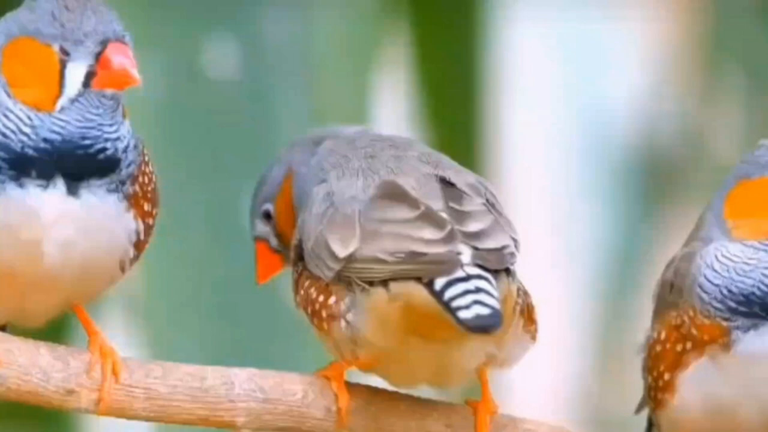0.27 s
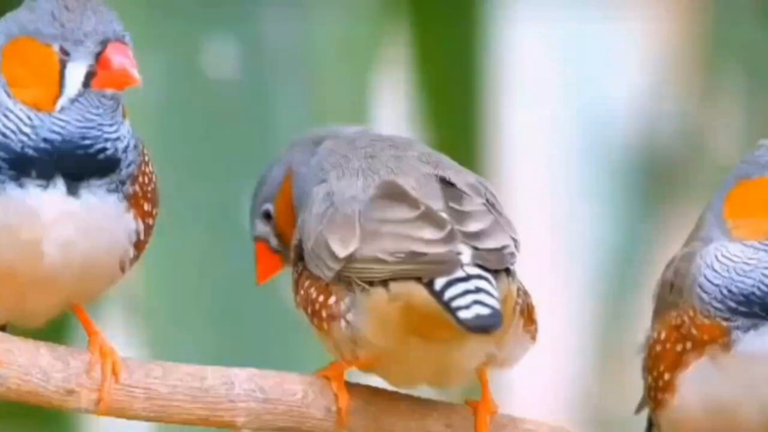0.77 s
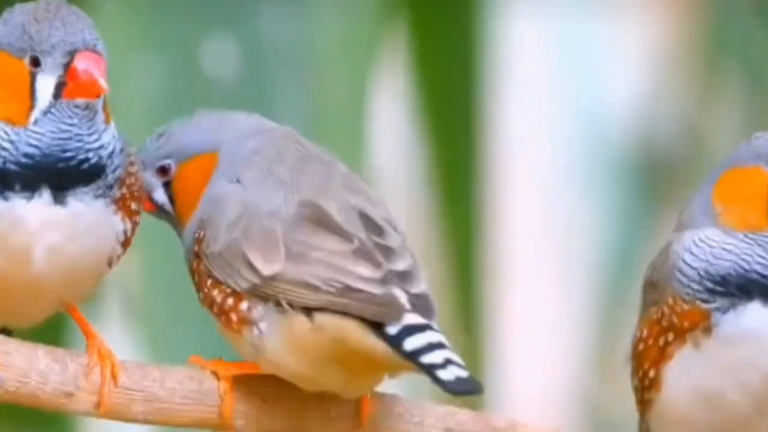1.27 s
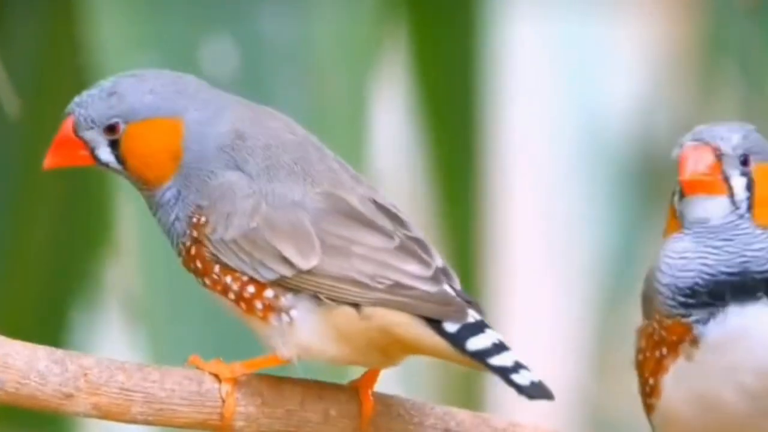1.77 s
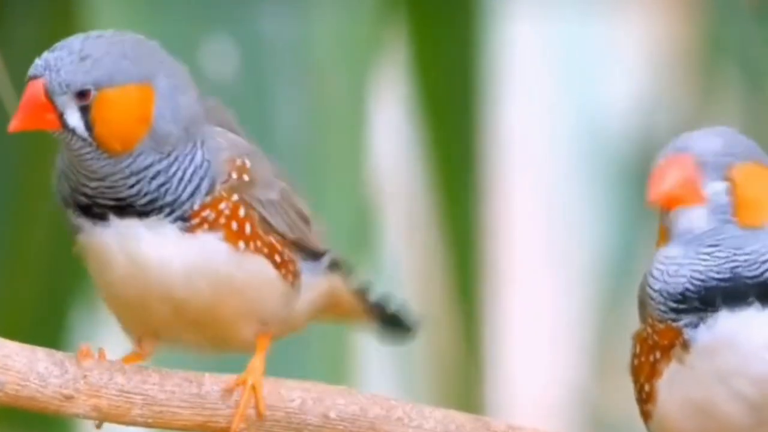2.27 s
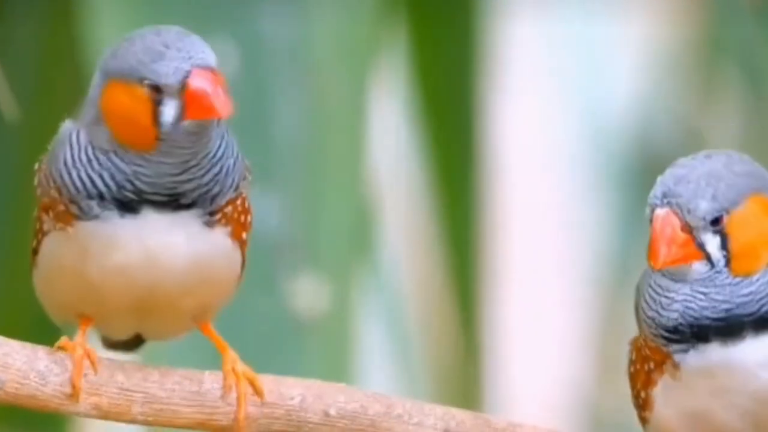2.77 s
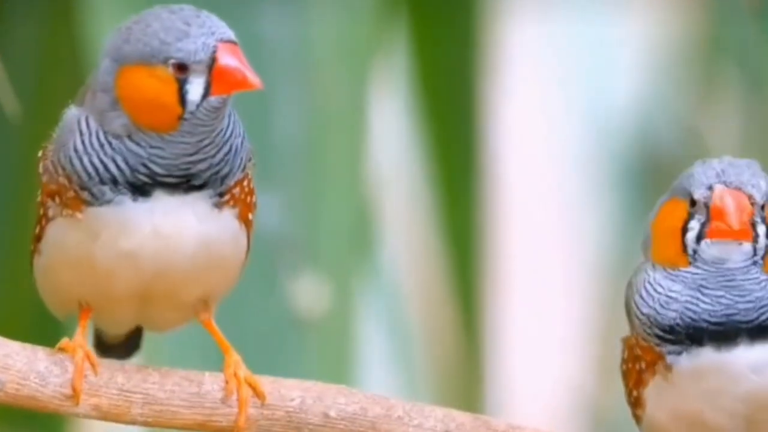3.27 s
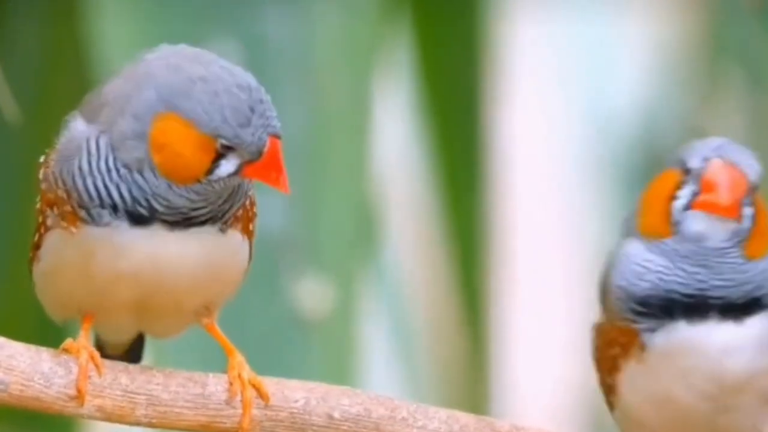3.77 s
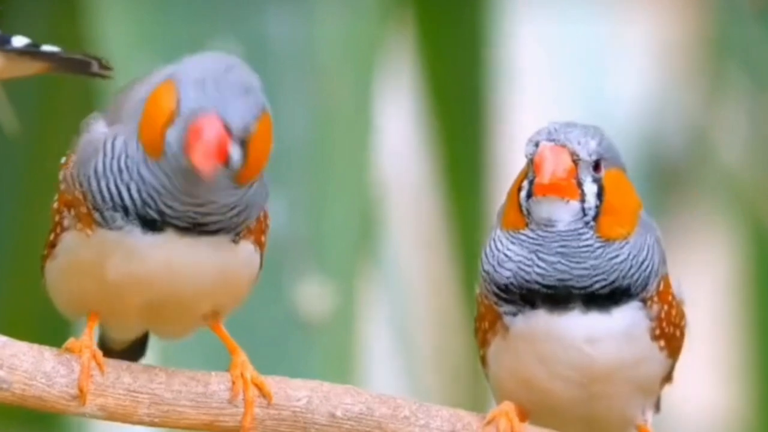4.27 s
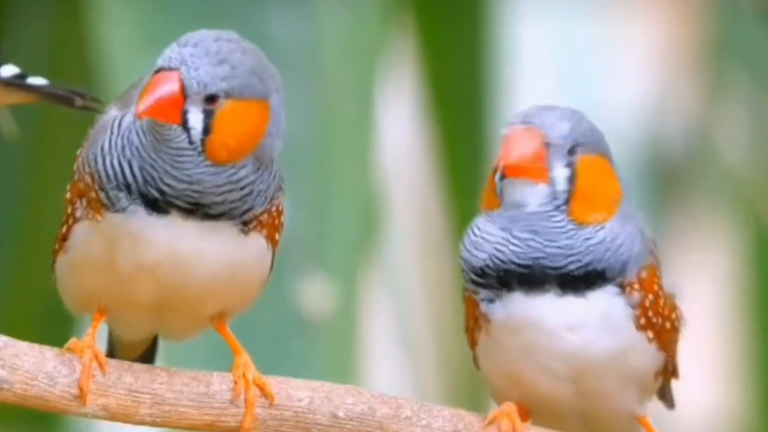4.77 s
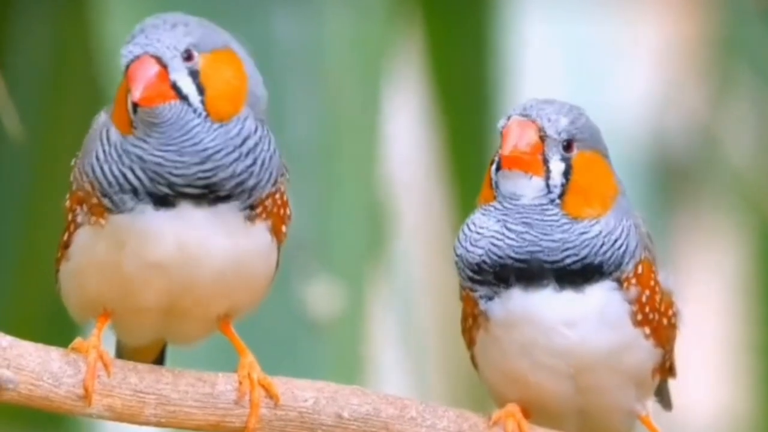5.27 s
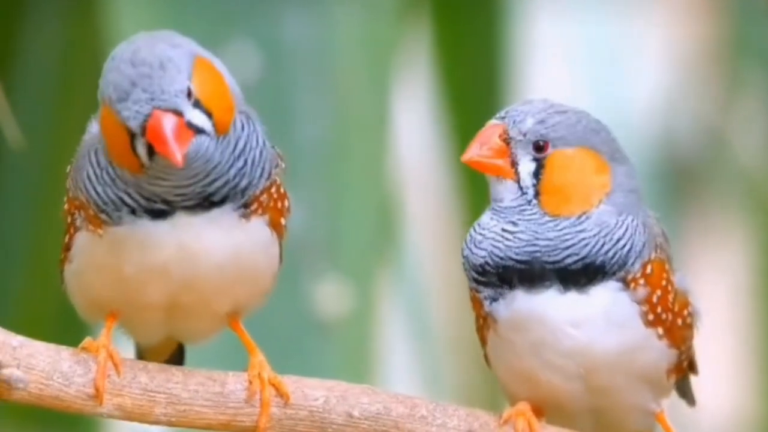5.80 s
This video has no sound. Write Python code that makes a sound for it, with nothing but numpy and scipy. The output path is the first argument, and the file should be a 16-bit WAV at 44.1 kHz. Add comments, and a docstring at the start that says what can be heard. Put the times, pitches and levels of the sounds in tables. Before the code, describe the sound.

A sparse string of clipped, buzzy finch calls, roughly every half second, heard dry and near. The early ones are quiet; later louder calls alternate with thinner ones. A long layered distant cry fills the gap after three seconds, and a strong two-note squeal comes just before five. Quick feather flutters, dry claw ticks and dull foot bumps surround them, with gentle room echo, faint hum, hiss and uneven rumble.

```python
"""Short nasal calls of zebra finches, close by; further off in the aviary, longer and echoing cries.
Feathers rustle, claws tick and feet bump the perch over hiss, low rumble and two faint hums.
Voices are syrinx harmonics plus pulsed air, coloured by a throat; cries add flutter and tremble.
Rustles, ticks, bumps and air are shaped noise; far peeps are gliding sines. Decaying noise echoes it."""
import sys
import numpy as np
from scipy import signal
from scipy.fft import rfft, irfft, next_fast_len
from scipy.io import wavfile

SR = 44100
rng = np.random.default_rng(int(sys.argv[2]) if len(sys.argv) > 2 else 0)


def wav_record(signal):
    """Record a signal, one row per channel, as 16-bit PCM in the file named by sys.argv[1]."""
    frames = np.transpose(np.atleast_2d(signal))
    bounded = np.clip(frames, -1, 1)
    # unit amplitude maps onto the largest positive 16-bit level
    quanta = np.round(bounded * 32767).astype(np.int16)
    wavfile.write(sys.argv[1], SR, quanta)


N = 266275

BAND_EDGE_HZ = 15780
AIR_LEVEL_DB = -69.5
SOFT_RASP_DB, LOUD_RASP_DB, THIN_RASP_DB = -18, -22, -17  # air against membrane tone
CRY_RISE_DB, CRY_FADE_DB = 16.5, 26.5  # how far below its fullest a cry starts and ends
PUSH_HALF_WIDTH_S = 0.0095

# Spectrum of the steady air. Each row: frequency in Hz, relative density in dB per Hz.
AIR_SPECTRUM = [(15, -25), (25, -1.5), (193, -4), (313, -7), (567, -10.5), (722, -12), (1110, -14),
                (1240, -15), (2560, -18), (3000, -17.5), (5880, -19), (7500, -17.5), (15500, -15.5)]
# Low rumble against its usual strength. Each row: time in seconds, level in dB before the waver.
RUMBLE_LEVELS = [(0, -1), (.8, 1), (2, 0), (3.1, 2), (4.1, 3), (5, -0.5), (5.9, 2)]
# Two low hums. Each row: centre in Hz, width in Hz.
HUM_BANDS = [(97, 19), (190, 7.2)]
# Waver of the hums, ahead of their common gain.
# Each row: time in seconds, level of the lower in dB, level of the upper in dB.
HUM_LEVELS = [(0.0, -94, -80), (0.59, -74.5, -85), (0.64, -95, -65), (0.82, -72, -86), (1.28, -86, -80),
              (1.38, -72, -78.5), (2.62, -86.5, -82), (2.84, -80, -83), (5.23, -87, -79.5),
              (5.33, -88.5, -83.5), (5.92, -79.5, -66), (6.04, -94, -75)]
# Echo decay. Each row: frequency in Hz, t60 in seconds.
ROOM_DECAY = [(300, 0.13), (1200, 0.19), (2500, 0.28), (4000, 0.16), (7000, .2), (15000, .14)]

# Spectrum of feather hiss, also used for the ticks. Each row: frequency in Hz, relative gain in dB.
FEATHER_SPECTRUM = [(200, -28), (700, -21.5), (1200, -6.5), (2500, -2), (5000, -0.5), (7500, -3),
                    (10000, 3.5), (12000, 0.5), (14500, 5), (16000, -5)]
# Feather rustles. Each row: start, fullest moment and end in seconds, level at the fullest in dB,
# body in dB added below the treble.
RUSTLES = [ (1.279, 1.29, 1.413, -54, 20), (1.411, 1.52, 1.73, -68.5, 2.5), (1.799, 1.807, 1.91, -57.5, 3),
           (2.409, 2.436, 2.495, -44.5, 7), (2.488, 2.513, 2.75, -63.5, -9), (2.711, 2.772, 2.84, -51.5, 7),
           (2.862, 2.868, 3.02, -55, 11.5), (2.939, 3.002, 3.14, -56, -3.5), (3.149, 3.165, 3.23, -57.5, 3),
           (4.116, 4.136, 4.165, -45, 6.5), (4.901, 4.947, 5.0, -44, 9)]
# Claw ticks. Each row: time in seconds, level at onset in dB.
CLAW_TICKS = [(1.725, -59), (2.39, -57.5), (2.484, -45), (2.499, -46), (2.696, -61), (2.905, -54),
              (2.944, -56), (2.974, -47.5), (3.156, -53), (3.193, -46), (4.137, -40)]
# Feet bumping the perch. Each row: time in seconds, level in dB.
FOOT_KNOCKS = [(.5, -67), (1.45, -71), (2.491, -70), (2.98, -64.5), (3.515, -67.5), (4.132, -66),
               (5.97, -66)]
# Perch resonances. Each row: centre in Hz, width in Hz, level against the knock in dB, t60 in seconds.
PERCH_MODES = [(550, 270, -7, 0.26), (700, 130, -9.5, 0.82), (1224, 330, -2.5, 0.27)]

# Throat and beak of each voice. Each row: frequency in Hz, relative gain in dB.
CRY_THROAT = [(600, -68), (1200, -21.5), (1800, -12), (2300, 1), (3000, 1), (3800, -1.5), (4800, -4.5),
              (5500, -10.5), (6200, -19.5), (7300, -20), (8500, -27), (10000, -23), (12000, -32),
              (16000, -39.5)]
SOFT_THROAT = [(554, -32.5), (1108, -5.5), (1662, -9.5), (2215, -1.5), (2769, -2), (3323, -5.5), (3877, -6),
               (4431, -20.5), (4985, -22), (5538, -39), (6369, -29), (7477, -46), (9415, -38), (12461, -43)]
LOUD_THROAT = [(594, -55), (1187, -16), (1781, -21), (2375, -4.5), (2968, -7.5), (3562, -0.1), (4155, 1),
               (4749, -13), (5343, -14), (5936, -33.5), (6827, -33), (8014, -40), (10092, -31.5),
               (13357, -45)]
THIN_THROAT = [(553, -52), (1106, -15.5), (1659, -15), (2212, -13.5), (2765, 0), (3318, -3.5), (3870, -1.5),
               (4423, -4), (4976, -20), (5529, -9.5), (6359, -24), (7464, -37), (9400, -28.5),
               (12441, -33.8)]

# Far cries, levels ahead of the far mix gain. Each row: start, fullest moment and end in seconds,
# pitch at these three moments in Hz, level at the fullest in dB, brightness in dB per octave,
# rasp in dB against the tone, rms pitch flutter as a share.
FAR_CRIES = [ (1.028, 1.06, 1.085, 2584, 2680, 2650, -65, -10, -15, .025),
             (1.87, 1.91, 2.05, 3110, 3310, 4100, -66.5, 2, -11, 0.073),
             (2.135, 2.165, 2.23, 1720, 1835, 1950, -60, -32, -13, 0.031),
             (2.141, 2.19, 2.29, 2580, 2840, 2820, -60.5, -13, -16, 0.045),
             (2.24, 2.29, 2.45, 2850, 2885, 2820, -61, -5, -11, 0.027),
             (2.311, 2.357, 2.44, 2380, 2390, 2380, -59.5, -3, -11, .03),
             (3.16, 3.25, 3.42, 553, 559.6, 524, -51, -3.5, -2, 0.015),
             (3.2, 3.49, 3.78, 1426, 1472, 1444, -48, 9.5, 6.5, 0.026),
             (3.41, 3.48, 3.8, 2556, 2590, 2547, -45.5, -13, -16, 0.0071),
             (3.37, 3.51, 3.73, 3790, 3716, 3620, -45.5, -5, -16, 0.013),
             (3.78, 3.86, 4.0, 600, 605, 597, -63.5, -4, 13, 0.036),
             (4.119, 4.145, 4.24, 2900, 2630, 2310, -50.5, -2.5, -4, 0.032),
             (4.16, 4.225, 4.285, 2450, 2267, 2230, -49.5, -4.5, -12, 0.019),
             (4.308, 4.317, 4.34, 3600, 3580, 3580, -54, 0, -13, 0.018),
             (4.29, 4.345, 4.42, 2200, 2170, 2210, -58, -13, -9.5, 0.041),
             (4.35, 4.425, 4.53, 1150, 1174, 1205, -51.5, 0, -2.5, 0.0165),
             (4.39, 4.47, 4.6, 1170, 1204, 1250, -51, 0.5, -23, 0.0097),
             (4.48, 4.57, 4.68, 1215, 1180, 990, -50, 1, -26, 0.018),
             (4.82, 4.86, 4.96, 2260, 2103, 1850, -40, -26.5, -27, .022),
             (5.19, 5.249, 5.37, 3824, 3888, 3300, -59, -10, -21, 0.005),
             (5.26, 5.325, 5.39, 2450, 2530, 2520, -68.5, -14, -30, .007),
             (5.379, 5.412, 5.47, 2860, 2753, 2860, -49.5, -1.5, 1, 0.064),
             (5.42, 5.51, 5.59, 2750, 3080, 3060, -59.5, -4, -6, .08)]
# A soft, dry rasp from a bird on the perch. Columns as for the far cries; level is final.
NEAR_RASP = [(5.48, 5.575, 5.595, 2910, 3230, 3400, -57, -6, -12.5, .06)]
# Loud far cry: two notes at once, one from each side of the syrinx.
# Each row: time in seconds, pitch in Hz, level in dB ahead of the note and mix gains.
LOW_NOTE = [(4.605, 2157, -49.5), (4.641, 2424, -36), (4.673, 2505, -45), (4.735, 2563, -46),
            (4.745, 2667, -53), (4.779, 2457, -37.5), (4.849, 2360, -37), (4.885, 2464, -45),
            (4.91, 2430, -54)]
HIGH_NOTE = [(4.645, 3040, -60), (4.653, 3060, -49), (4.687, 3066, -34.5), (4.797, 3025, -37),
             (4.89, 2930, -66)]
# Short calls. Each row: voice, start and end in seconds, top pitch in Hz, rise to the top in Hz,
# fall from it in Hz, level in dB ahead of bow, edges and push, moment of the hardest push in seconds,
# push in dB, brightness in dB per octave.
SHORT_CALLS = [ ("soft", 1.03, 1.08, 544, 47.5, 15, -70, 1.07, 5.2, -0.99),
               ("soft", 1.278, 1.336, 580, 94, 66, -44, 1.321, 12.1, 4.7),
               ("soft", 1.823, 1.885, 543.6, 131, 68, -41, 1.86, 1.3, 3.7),
               ("soft", 2.416, 2.481, 564, 83.4, 107, -41, 2.461, 6.2, 2.6),
               ("loud", 2.722, 2.803, 588, 69, 60.5, -38, 2.783, 7.2, -0.72),
               ("loud", 3.303, 3.389, 595, 90, 59, -31, 3.368, 4, 1.3),
               ("loud", 3.904, 3.991, 591, 63, 48, -30.5, 3.973, 3.7, .6),
               ("thin", 4.738, 4.796, 559, 154, 69, -36.5, 4.78, 4.2, 0.35),
               ("loud", 4.903, 4.983, 597, 83, 57, -32.5, 4.967, 4.4, -2.7),
               ("thin", 5.357, 5.42, 548, 111, 53.5, -42, 5.407, 3.5, 0.52),
               ("loud", 5.683, 5.767, 594, 56, 44.4, -36, 5.751, 7.5, 0.95),
               ("thin", 5.944, 6.008, 549, 107, 21, -46.5, 5.978, 4, 1.7)]


def amp(db):
    """Decibels to gain."""
    return 10 ** (np.asarray(db) / 20)


def unit(x):
    """Scales to rms 1."""
    return x / np.sqrt(np.mean(x ** 2) + 1e-20)


def read(points, hz):
    """Interpolates a table on a log-frequency axis."""
    f, value = np.transpose(points)
    return np.interp(np.log(hz + 1), np.log(f + 1), value)


def add(mix, start_s, sound):
    """Mixes a sound in at its start time."""
    part = mix[round(start_s * SR):][:len(sound)]
    part += sound[:len(part)]


def noise(size, gain):
    """Noise of rms 1 whose spectrum is the function gain(hz)."""
    length = next_fast_len(size + 4096)
    white = rfft(rng.standard_normal(length))
    shaped = irfft(white * gain(np.fft.rfftfreq(length, 1 / SR)), length)
    return unit(shaped[:size])


def wobble(size, rate_hz):
    """Random drift of rms 1, mostly slower than rate_hz."""
    return noise(size, lambda f: 1 / (1 + (f / rate_hz) ** 4))


def resonance(size, centre_hz, width_hz):
    """Noise of rms 1 in one resonant band."""
    return noise(size, lambda f: 1 / (1 + (2 * (f - centre_hz) / width_hz) ** 2))


def feather_hiss(size, body_db, body_hz=5500):
    """Feather noise of rms 1 with body_db added below body_hz."""
    return noise(size, lambda f: amp(read(FEATHER_SPECTRUM, f) + body_db / (1 + (f / body_hz) ** 4)))


def swell(t, start, fullest, end):
    """Two ramps: 1 to 0 on the way to the fullest moment, 0 to 1 after it."""
    before = np.interp(t, [start, fullest], [1, 0])
    after = np.interp(t, [fullest, end], [0, 1])
    return before, after


def background(hum_gain_db=-2, rumble_waver_db=1.6):
    """Hiss over an uneven low rumble, with two narrow-band hums that come and go."""
    t = np.arange(N) / SR
    air = amp(AIR_LEVEL_DB) * noise(N, lambda f: amp(read(AIR_SPECTRUM, f)))
    low = signal.sosfiltfilt(signal.butter(2, 400, fs=SR, output="sos"), air)
    rumble_db = np.interp(t, *np.transpose(RUMBLE_LEVELS)) + rumble_waver_db * wobble(N, 6.4)
    out = air + low * (amp(rumble_db) - 1)
    times_s, *levels = np.transpose(HUM_LEVELS)
    for (centre_hz, width_hz), db in zip(HUM_BANDS, levels):
        out += amp(hum_gain_db + np.interp(t, times_s, db)) * resonance(N, centre_hz, width_hz)
    return out


def room(x, gap_s=0.0048):
    """Dense wall reflections: noise after a short gap, decaying at a t60 that depends on frequency."""
    size = SR // 2
    hz, t, grid = signal.stft(rng.standard_normal(size), SR, nperseg=256)
    decay = amp(-60 * t / read(ROOM_DECAY, hz)[:, None])
    tail = signal.istft(grid * decay, SR, nperseg=256)[1][:size]
    tail = tail * np.clip(np.arange(size) / SR / gap_s - 1, 0, 1)
    return signal.fftconvolve(x, tail / np.linalg.norm(tail))[:N]


def twitter(floor_db, spread_db=1.0, count=80):
    """Very distant birds: thin, high peeps, each a short gliding sine under a half-sine swell."""
    out = np.zeros(N)
    for at, length, height, glide, loud in rng.random((count, 5)):
        u = np.linspace(0, 1, round((0.041 + 0.02 * length) * SR))
        pitch_hz = (7100 + 750 * height) * (1 + .05 * (glide - .5) * u)
        pitch_hz = pitch_hz * (1 + 0.005 * wobble(len(u), 130))
        note = np.sin(np.pi * u) * np.sin(2 * np.pi * np.cumsum(pitch_hz) / SR)
        add(out, at * N / SR, amp(floor_db + spread_db * loud) * note)
    return out


def preening(level_db=-72, body_db=-4, flutter_db=4.0, start=0.27, fullest=2.2, end=8.6):
    """Faint, fitful feather hiss: grows to its fullest, then slowly sinks."""
    before, after = swell(np.arange(N) / SR, start, fullest, end)
    level = amp(level_db + flutter_db * wobble(N, 14)) * (1 - before - after)
    return level * feather_hiss(N, body_db)


def feathers(grain_db=1.4, flutter_db=2.0):
    """Feathers slide over each other in uneven bursts of hiss."""
    out = np.zeros(N)
    for start, fullest, end, level_db, body_db in RUSTLES:
        t = np.arange(start, end, 1 / SR)
        unevenness_db = grain_db * wobble(len(t), 300) + flutter_db * wobble(len(t), 50)
        grains = unit(feather_hiss(len(t), body_db) * amp(unevenness_db))
        envelope = np.interp(t, [start, fullest, end], [.1, 1, .1])
        add(out, start, amp(level_db) * envelope * grains)
    return out


def claws(t60_s=0.051):
    """Dry ticks of claws on the perch: noise bursts with exponential decay."""
    out, t = np.zeros(N), np.arange(SR // 20) / SR
    for start, level_db in CLAW_TICKS:
        add(out, start, amp(level_db - 60 * t / t60_s) * feather_hiss(len(t), 0))
    return out


def knocks():
    """Dull bumps of feet, each ringing the perch's damped resonances."""
    out, t = np.zeros(N), np.arange(SR // 2) / SR
    for start, level_db in FOOT_KNOCKS:
        for centre_hz, width_hz, mode_db, t60_s in PERCH_MODES:
            decay = amp(level_db + mode_db - 60 * t / t60_s)
            add(out, start, decay * resonance(len(t), centre_hz, width_hz))
    return out


def syrinx(pitch_hz, throat, bright_db, rasp_db, beak=1, shimmer_db=2.5, smear=.05):
    """Membrane harmonics and air puffed once a cycle, coloured by the throat; beak shifts tone resonances."""
    def colour(hz):
        return amp(read(throat, hz) + bright_db * np.log2(np.clip(hz, 1000, 7000) / 3000))

    size = len(pitch_hz)
    phase = 2 * np.pi * np.cumsum(pitch_hz) / SR
    k = np.arange(1, int(BAND_EDGE_HZ / pitch_hz.min()) + 1)[:, None]
    harmonic_hz = k * pitch_hz
    # the throat rings after each pulse: every harmonic lags by the phase that goes with its gain
    grid_hz = np.fft.fftfreq(4096, 1 / SR)
    ring = np.fft.fftshift(signal.hilbert(np.log(colour(abs(grid_hz)))).imag)
    lag = np.interp(harmonic_hz, np.fft.fftshift(grid_hz), ring)
    # the membranes close gradually, which spreads each pulse over its cycle
    lag = lag + 2 * np.pi * smear * k ** 2
    gains = colour(harmonic_hz / beak) * (harmonic_hz < SR / 2)
    # unsteady pulse shape: harmonics swell and fade on their own, the high ones most
    drift = np.array([wobble(size, 45) for _ in k])
    gains = gains * amp(shimmer_db * np.sqrt(harmonic_hz / 3000) * drift)
    tone = (gains * np.cos(k * phase - lag)).sum(0)
    tone /= np.sqrt((gains ** 2).sum(0) / 2)
    air = unit(noise(size, colour) * (1 + 0.1 * np.cos(phase)))
    return (tone + amp(rasp_db) * air) / np.hypot(1, amp(rasp_db))


def cry(pitch_hz, level_db, bright_db, rasp_db, flutter, tremble_db=2.75):
    """A syrinx voice with a fast flutter in pitch and a tremble in level."""
    size = len(pitch_hz)
    level = amp(level_db + tremble_db * wobble(size, 90)) * signal.windows.tukey(size, .08)
    fluttered_hz = pitch_hz * (1 + flutter * wobble(size, 229))
    return level * syrinx(fluttered_hz, CRY_THROAT, bright_db, rasp_db)


def cries(rows, fade_shape=1.74):
    """Each cry glides to its main pitch as it swells, then drifts off as it fades."""
    out = np.zeros(N)
    for start, fullest, end, first_hz, main_hz, last_hz, level_db, bright_db, rasp_db, flutter in rows:
        before, after = swell(np.arange(start, end, 1 / SR), start, fullest, end)
        pitch_hz = main_hz + (first_hz - main_hz) * before ** 2 + (last_hz - main_hz) * after ** 2
        effort_db = level_db - CRY_RISE_DB * before ** 2 - CRY_FADE_DB * after ** fade_shape
        add(out, start, cry(pitch_hz, effort_db, bright_db, rasp_db, flutter))
    return out


def loud_cry(note, gain_db, bright_db, rasp_db, flutter):
    """One side of the syrinx sounds one note, its pitch and level following the table."""
    out = np.zeros(N)
    times_s, points_hz, points_db = np.transpose(note)
    t = np.arange(times_s[0], times_s[-1], 1 / SR)
    pitch_hz = np.interp(t, times_s, points_hz)
    level_db = gain_db + np.interp(t, times_s, points_db)
    add(out, times_s[0], cry(pitch_hz, level_db, bright_db, rasp_db, flutter))
    return out


def short_calls(voice, throat, rasp_db, jitter, closing, bow_db, onset_db, end_db,
                attack_s=0.016, release_s=0.013):
    """Pitch arches, one push swells the level, the beak closes; shakiest at the start and stop."""
    out = np.zeros(N)
    for who, start, end, top_hz, rise_hz, fall_hz, level_db, push_at, push_db, bright_db in SHORT_CALLS:
        if who != voice:
            continue
        t = np.arange(0, end - start, 1 / SR)
        arch = 2 * t / t[-1] - 1  # -1 at the start, 1 at the end
        pitch_hz = top_hz - rise_hz * np.maximum(-arch, 0) ** 2.5 - fall_hz * np.maximum(arch, 0) ** 2
        pitch_hz = pitch_hz * (1 + jitter * (1 + 2 * arch ** 2) * wobble(len(t), 180))
        attack_db = onset_db * np.maximum(1 - t / attack_s, 0)
        release_db = end_db * np.maximum(1 - t[::-1] / release_s, 0)
        push = push_db * np.exp(-((start + t - push_at) / PUSH_HALF_WIDTH_S) ** 2)
        effort_db = level_db + bow_db * arch ** 2 + attack_db + release_db + push
        sound = syrinx(pitch_hz, throat, bright_db, rasp_db, beak=1 - closing * arch)
        add(out, start, amp(effort_db) * signal.windows.tukey(len(t), .1) * sound)
    return out


def scene():
    """Near birds mostly direct sound; far cries at equal direct and echo gain; peeps only as echo."""
    peeps = twitter(floor_db=-81.5)
    moves = preening() + feathers() + claws() + knocks()
    far = cries(FAR_CRIES)
    far += loud_cry(LOW_NOTE, gain_db=0.9, bright_db=2.0, rasp_db=-19.5, flutter=0.022)
    far += loud_cry(HIGH_NOTE, gain_db=2.0, bright_db=-5, rasp_db=-20.5, flutter=0.024)
    far *= amp(-5.5)
    soft = short_calls("soft", SOFT_THROAT, SOFT_RASP_DB, jitter=0.0085, closing=0.016,
                       bow_db=-8.5, onset_db=-11.5, end_db=4.5)
    loud = short_calls("loud", LOUD_THROAT, LOUD_RASP_DB, jitter=0.0056, closing=0.028,
                       bow_db=0, onset_db=-15, end_db=0)
    thin = short_calls("thin", THIN_THROAT, THIN_RASP_DB, jitter=0.0094, closing=0.091,
                       bow_db=-12, onset_db=-5, end_db=10)
    direct = soft + loud + thin + moves + cries(NEAR_RASP) + far
    near_send = amp(-13.5) * soft + amp(-9.0) * loud + amp(-10) * thin + amp(-13.0) * moves
    echo = room(near_send + far + peeps)
    return (background() + echo + direct)[None]


def record(dry):
    """The recorder's band limit: a linear-phase low-pass."""
    lowpass = signal.firwin(601, BAND_EDGE_HZ, window=("kaiser", 9), fs=SR)
    return signal.oaconvolve(dry, lowpass[None], "same")


dry = scene()
out = record(dry)
wav_record(out)
```